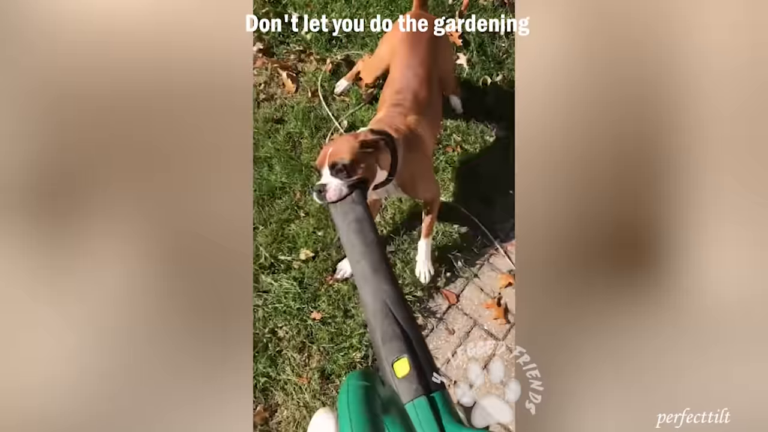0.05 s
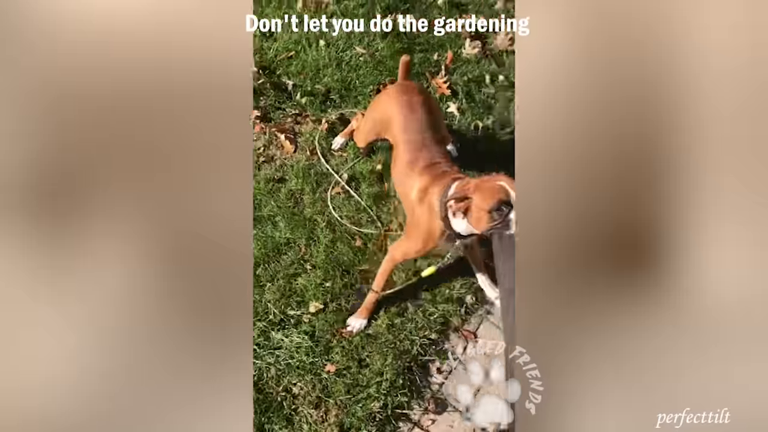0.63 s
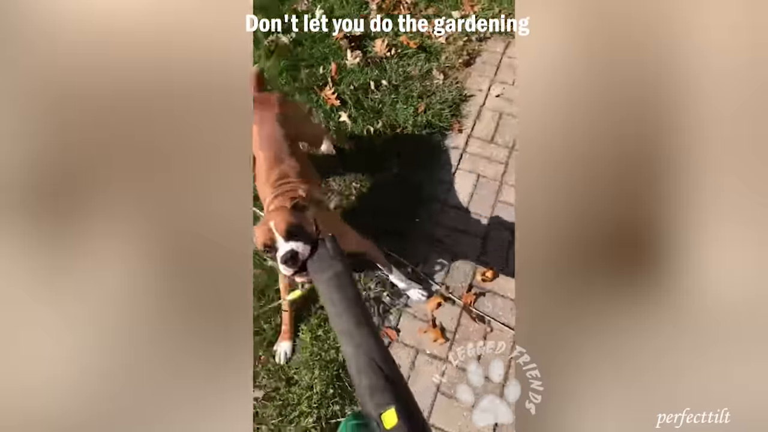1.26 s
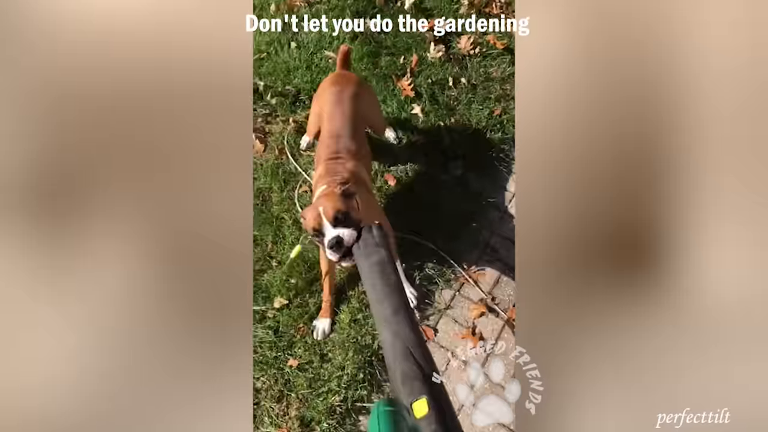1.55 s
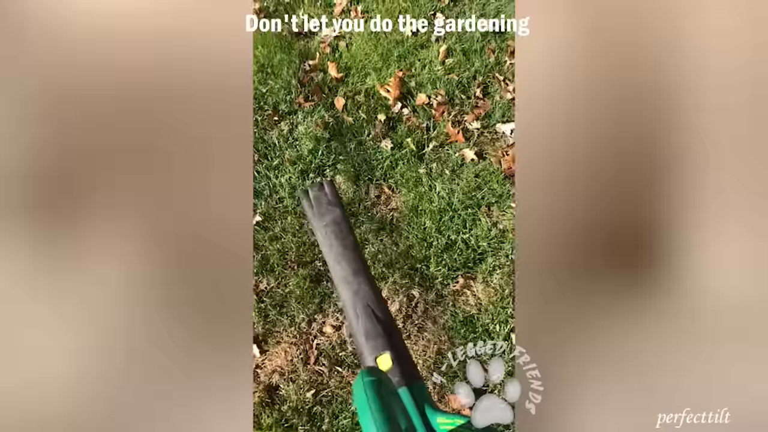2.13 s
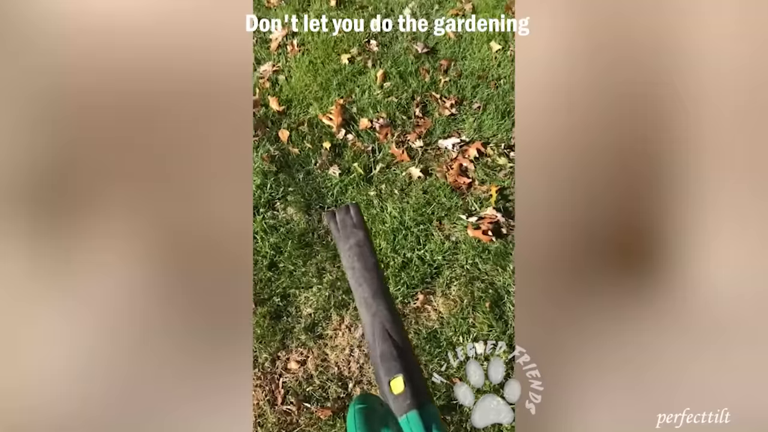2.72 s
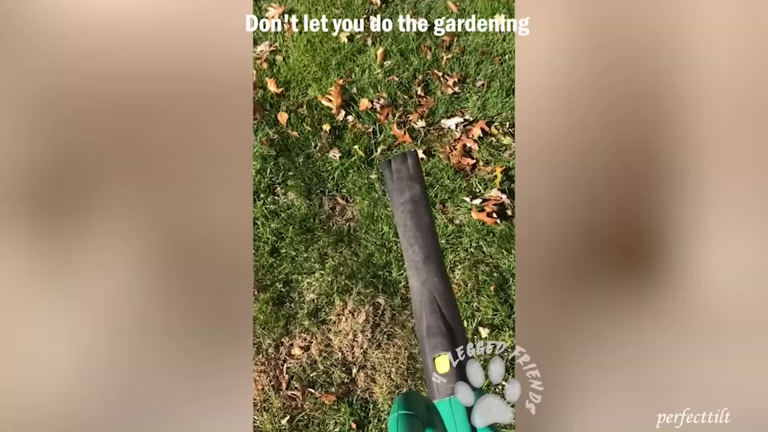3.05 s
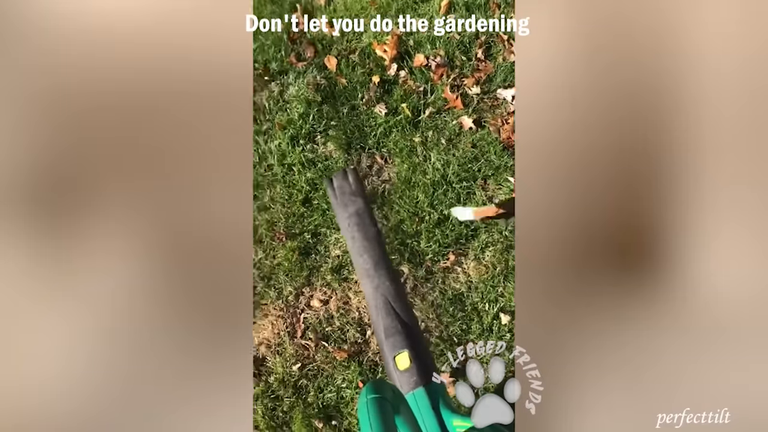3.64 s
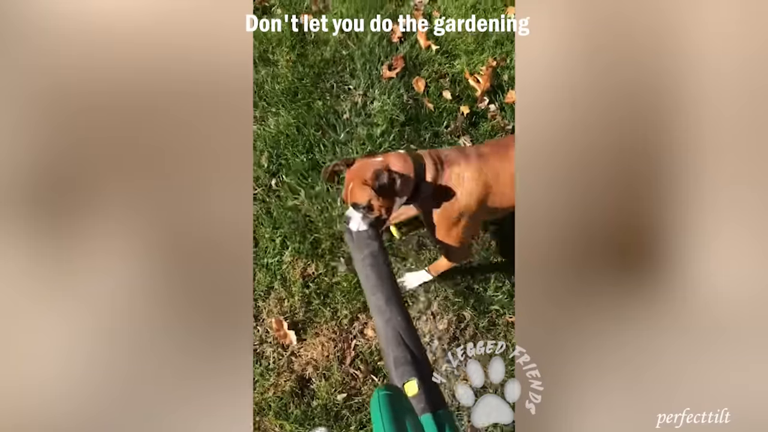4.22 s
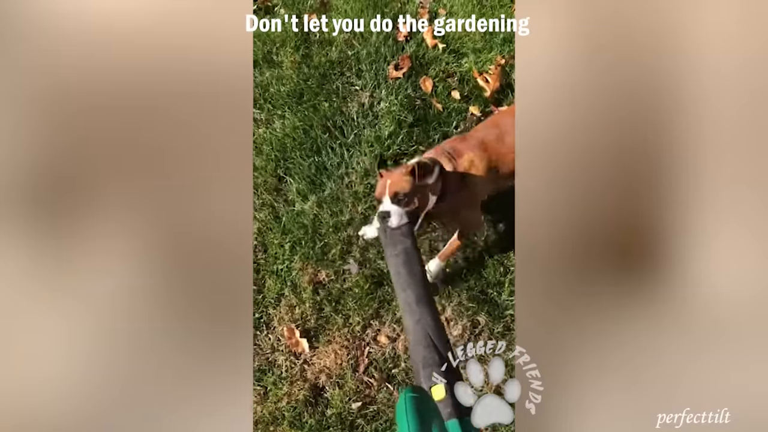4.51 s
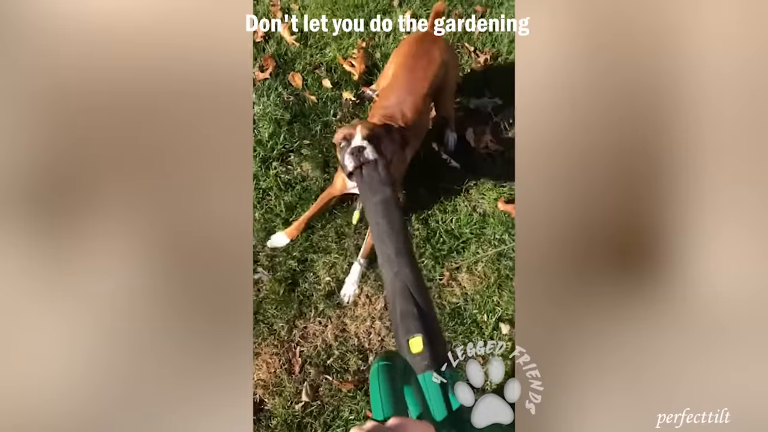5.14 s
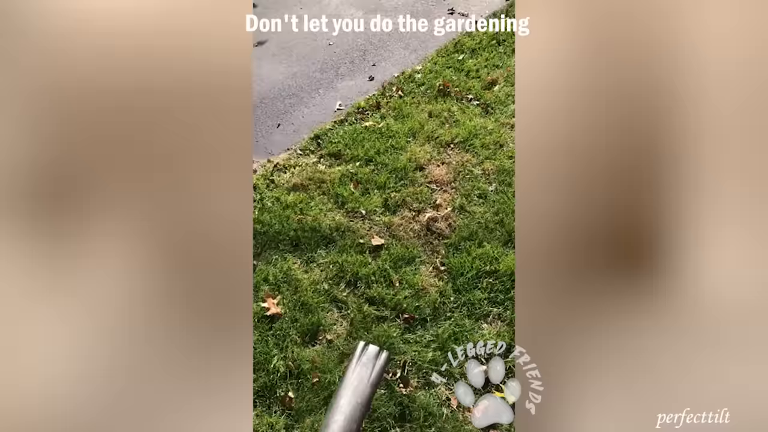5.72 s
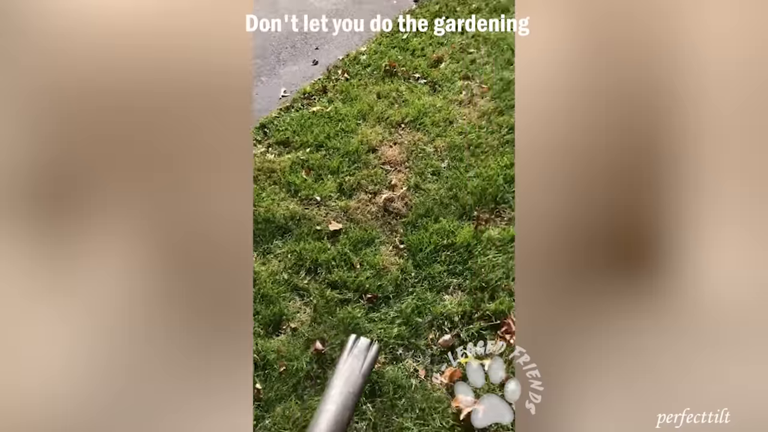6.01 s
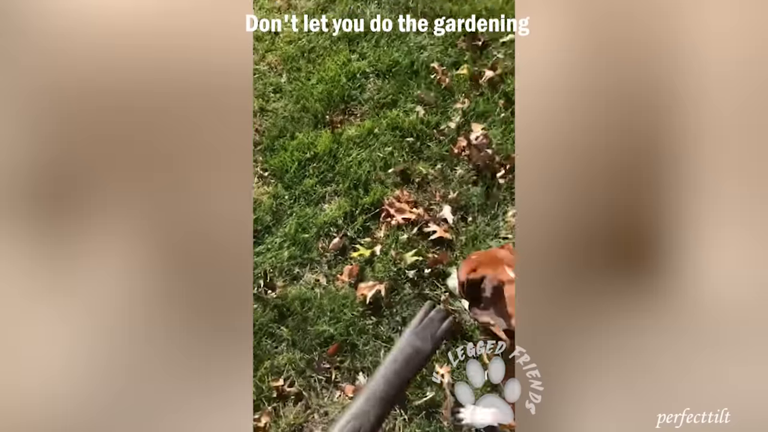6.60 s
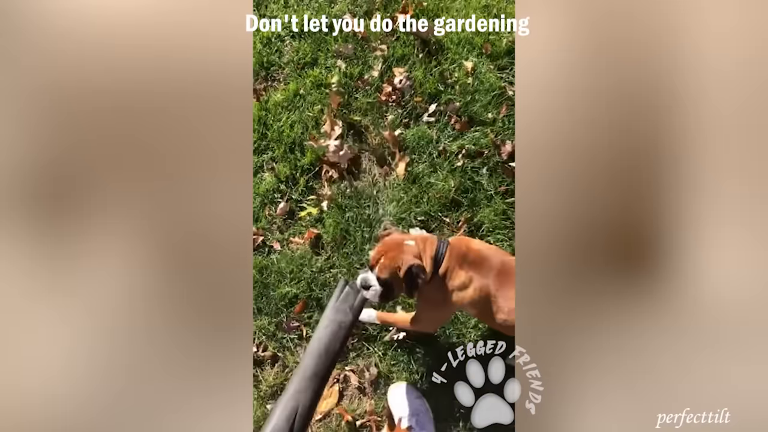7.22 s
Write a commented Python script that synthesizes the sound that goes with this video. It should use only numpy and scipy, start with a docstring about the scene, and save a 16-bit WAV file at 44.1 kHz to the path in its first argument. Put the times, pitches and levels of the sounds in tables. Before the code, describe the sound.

An electric leaf blower is already at full speed close by outdoors, a steady whine over a roar of air. Its hiss flutters and swells in hollow gusts as a dog bites at the nozzle, and a petrol mower drones faintly behind. At about 2.1 seconds everything cuts off abruptly, leaving two soft ticks and quiet garden air. Around 2.7 seconds the plastic switch and handle clack several times, and the motor starts with a short growl, whining upward to full speed by about 3.5 seconds. It blows steadily, with more hissing gusts from 4.5 to 5.4 seconds. At 5.8 seconds it breaks off again, and the distant mower is heard clearly. At 6.2 seconds a double clack starts another growl and rising whine. The blower reaches full speed near 7 seconds and roars over the mower until the end at 7.5 seconds.

```python
"""An electric leaf blower roars and whines over a lawn while a dog snaps at its nozzle.
Turbulence makes the roar in the tube and the hiss at the outlet; the fan and motor radiate
harmonics of the shaft rotation (orders). A petrol mower drones further off. Twice everything
breaks off; each time the switch clacks, the inrush current makes the plastic shell growl,
and the motor winds up again through its resonances."""
import sys
import numpy as np
from scipy import signal
from scipy.fft import rfft, irfft, next_fast_len
from scipy.io import wavfile
from scipy.ndimage import uniform_filter1d

SR = 44100
rng = np.random.default_rng(int(sys.argv[2]) if len(sys.argv) > 2 else 0)


def file_out(sig):
    """Save sig as 16-bit WAV at sys.argv[1]."""
    # one column per channel
    cols = np.atleast_2d(sig).T
    # limit, then scale
    lim = np.clip(cols, -1, 1)
    pcm = np.round(lim * 32767).astype(np.int16)
    wavfile.write(sys.argv[1], SR, pcm)


N = 328986
T = np.arange(N) / SR
FULL_HZ, MAINS_HZ = 250.5, 60  # full shaft speed, supply frequency
BLADE_COUNT, COMMUTATOR_BARS = 10, 12

# Air stream at full speed, a row per stretch of sound: roar_db, intake_db, hiss_db, spray_db
AIR_LEVELS = [(-24.5, -36.5, -34.5, -46.5), (-24.5, -37.5, -34.5, -42.5), (-26, -36.5, -34, -36)]
# Spectra of tube, intake, outlet (one per stretch) and jet spray: frequency_hz, density_db
ROAR_SPECTRUM = [(30, -26.5), (60, -22.5), (110, -16), (220, -10.5), (330, -3.5), (455, 0.5), (580, -6.5),
                 (780, -0.5), (950, -1.5), (1250, -3.5), (1480, -17.5), (1800, -28), (3000, -44.5)]
INTAKE_SPECTRUM = [(900, -26.5), (1400, 2.5), (1700, -0.5), (2000, 1.5), (2400, 1.5), (2650, -1.5),
                   (2900, -8), (3400, -28), (6000, -72)]
HISS_SPECTRA = [
    [(2500, -7), (3100, 0), (3500, 2), (4200, 5), (4800, 2), (5500, 4), (6200, 4.5), (6900, 1),
     (7400, -0.5), (8000, -3.5), (8800, -6), (10500, -21.5), (13000, -44)],
    [(2500, -28), (3100, -1.5), (3500, 5), (4200, 3), (4800, -1), (5500, 0), (6200, -1.5), (6900, -0.5),
     (7400, 4), (8000, -2.5), (8800, -15), (10500, -16.5), (13000, -53)],
    [(2500, -21), (3100, 6), (3500, 7), (4200, 2), (4800, 0.5), (5500, -2.5), (6200, -4), (6900, -2),
     (7400, 1.5), (8000, -6), (8800, -20), (10500, -6), (13000, -20)],
]
SPRAY_SPECTRUM = [(5000, -41), (7500, -8.5), (8700, 3), (10000, -2.5), (11500, -8.5), (13000, -19)]
# The jet splashes off the dog's muzzle: centre_s, half_length_s, hiss_lift_db, spray_lift_db
SPLASHES = [(.03, 0.23, 1, 6.5), (1.1, 0.35, 1.5, 2.5), (3.733, 0.37, 1, 1.5), (4.537, 0.059, 1, 3.5),
            (4.95, 0.039, 1, 5), (5.15, 0.1, 3.5, 7.5), (5.377, 0.064, 2, 5), (7.436, 0.073, 1.5, 1)]
# The dog holds the nozzle: start_s, end_s
GRIPS = [(-1, 2.15), (4.5, 5.82)]
# Hollow bands of rushing air: centre_s, half_length_s, pitch_hz, width_hz, level_db, glide_hz_per_s
HOLLOW_RUSHES = [(0.227, 0.047, 4120, 700, -35, 0), (0.226, 0.05, 6760, 1010, -33.5, 4998),
                 (.25, 0.036, 2186, 447, -30.5, -2000), (0.451, 0.054, 2340, 551, -34, -4000),
                 (0.524, 0.086, 6800, 600, -42, -5000), (.82, .035, 2250, 546, -32, 0),
                 (1.01, .07, 2400, 600, -33.5, 0), (1.164, .06, 4500, 800, -36.5, 5999.5),
                 (1.522, 0.11, 2620, 501, -36, 0), (1.8, 0.26, 6080, 646, -37, 2),
                 (4.38, 0.11, 1633, 260, -33.5, -0.5), (4.532, 0.024, 5900, 1990, -32.5, -2),
                 (4.803, 0.23, 870, 220.6, -31.5, 0), (4.952, 0.086, 4000, 900, -34.5, -0.5),
                 (5.22, 0.13, 3800, 1000, -34, -2500), (5.38, 0.05, 4100, 1500, -31.5, 0),
                 (6.978, 0.14, 3300, 450, -35.5, -1200), (7.05, 0.33, 835.6, 220, -29, 0)]

# Blade tone at full speed as the tube swings, a curve per stretch: time_s, level_db
BLADE_LEVEL_1 = [(0, -31), (.1, -28), (.3, -34), (.38, -33), (.48, -39), (.58, -29), (.66, -32),
                 (.88, -29.5), (1.1, -34), (1.28, -32), (1.43, -45), (1.55, -34), (1.75, -34), (2, -41),
                 (2.07, -32)]
BLADE_LEVEL_2 = [(3.35, -41), (3.55, -35.5), (3.75, -37), (4, -32.5), (4.15, -34), (4.38, -43), (4.48, -37),
                 (4.7, -36), (4.83, -39.5), (4.95, -34), (5.05, -36), (5.23, -28), (5.38, -35),
                 (5.5, -30.5), (5.68, -29.5), (5.76, -32)]
BLADE_LEVEL_3 = [(6.75, -44), (6.87, -36), (7.05, -39), (7.19, -34), (7.3, -39), (7.36, -36), (7.45, -42)]
# Other motor tones at full speed: order, stretch_1_db, stretch_2_db, stretch_3_db
MOTOR_TONES = [(1, -35.5, -37.5, -53), (3, -39, -36.5, -39), (12, -50, -52.5, -51), (14, -59, -54, -57),
               (20, -48.5, -48, -53), (24, -49, -51.5, -56), (30, -52.5, -43.5, -56.5),
               (35, -56.5, -60, -62), (36, -58, -53, -53), (39, -61.5, -72, -70)]
# The swinging housing beams an overtone at the listener: centre_s, half_length_s, order, lift_db
BEAMS = [(.13, .1, 24, 5), (.73, .06, 20, 8), (1.5, .12, 20, 5), (1.8, .22, 24, 7.5), (1.89, .04, 20, 8),
         (5.55, .22, 20, 2), (7.38, .17, 20, 5), (7.4, .16, 36, 10)]
# Resonances and dips of the housing: centre_hz, width_hz, gain_db
HOUSING_RESONANCES = [(60, 150, -30), (600, 200, -7), (2050, 500, 5), (4895, 130, 10.5), (7450, 1100, 10),
                      (7170, 370, 13)]
# The motor is switched on: start_s, initial_shaft_hz, wind_up_s, growl_db, sizzle_db, growl_centre_hz
STARTS = [(2.744, 0, .241, -30, -45, 520), (6.238, 39.3, .25, -31, -53, 760)]
# Resonances met in the run-ups: order, peak_shaft_hz, spread_hz, first_run_db, second_run_db
RUN_UP_RESONANCES = [(12, 71, 11, -42, -38), (12, 105, 18, -45, -45), (12, 162, 22, -41.5, -44),
                     (12, 195, 12, -52, -46), (10, 120, 18, -48, -46), (10, 160, 16, -43.5, -49),
                     (10, 194, 8, -60, -43), (10, 217, 6, -46, -54), (20, 208, 12, -54, -50),
                     (24, 86, 9, -49, -58), (24, 125, 14, -60, -53), (24, 182, 16, -54, -51),
                     (24, 219, 6, -44.5, -50), (30, 232, 4, -70, -44), (35, 243, 4, -52, -64),
                     (36, 143, 10, -53, -54), (36, 195, 8, -38, -64), (36, 214, 4, -40.5, -64),
                     (36, 242, 4, -49.5, -62), (48, 186, 9, -53, -50)]
# Tones of the brushes: order, relative_db
BRUSH_TONES = [(72, -55.5), (96, -63), (108, -62.5), (144, -66), (168, -65)]
# The brushes are heard only at low speed: shaft_hz, gain
BRUSH_RANGE = [(5, 0), (35, 1), (80, .8), (160, 0)]
# Friction of brushes on the commutator: frequency_hz, density_db
RUB_SPECTRUM = [(400, 2.5), (1000, -7), (2500, -1.5), (4500, -6.5), (6200, -6), (7400, -1), (8500, -21),
                (10000, -7), (13000, -33)]

# Clacks of switch and handle: start_s, snap_db, knock_db, snap_decay_s, shell_centre_hz
CLACKS = [(2.438, -64, -75, .02, 900), (2.634, -51.5, -57, 0.0082, 900), (2.674, -49, -37, 0.0026, 600),
          (2.687, -35.5, -40, 0.01, 1100), (2.696, -48, -24.5, 0.0016, 850),
          (2.737, -40.5, -26, 0.0058, 1150), (6.195, -30, -23.5, 0.004, 1200),
          (6.23, -35, -30, 0.0057, 1200)]
# Modes of the plastic shell: pitch_hz, level_db, t60_s
SHELL_MODES = [(428, 2, 0.13), (473, -7, 0.058), (580, 3, 0.018), (752, 2, 0.046), (828, -1, 0.077),
               (900, -2, 0.044), (1060, -7, 0.035), (1115, 1.5, 0.034), (1264, 0, 0.033), (1500, -3, 0.018),
               (1980, -2, 0.017), (3190, -12, .015)]
# Soft falling ticks: start_s, level_db, initial_pitch_hz
TICKS = [(2.2154, -35.5, 12700), (2.265, -37.5, 4800)]
# The handle squeaks in the hand: centre_s, half_length_s, pitch_hz, level_db
SQUEAKS = [(2.614, 0.0033, 6300, -64), (2.611, .004, 4900, -57.5)]

# Stretches of sound between the breaks, with their background:
# start_s, end_s, mower_firing_hz, mower_db, garden_db, mower_tilt_db_per_octave, rumble_db
STRETCHES = [(-.01, 2.092, 20.6, -38, -40, -2.5, -56.5), (2.205, 5.758, 21.6, -65.5, -57.5, -20, -69),
             (5.875, 7.5, 22.92, -35, -43, 3, -56)]
# Mower exhaust: firing_harmonic, relative_db
EXHAUST_HARMONICS = [(2, -4), (3, -10), (4, -5.5), (5, -3), (6, 1), (7, -11), (8, 3), (9, -6), (10, -7.5),
                     (12, 0), (13, -7), (14, -14), (15, -11), (16, -6), (18, -14), (20, -11)]
# The mower swells and recedes: time_s, lift_db
MOWER_SWELL = [(6.1, 0.5), (6.6, 3.5), (7.4, 1.5)]
# Its upper harmonics brighten: time_s, added_tilt_db_per_octave
MOWER_BRIGHTNESS = [(6.35, -2.5), (6.7, 0.5)]
# Spectra of the garden and of low outdoor rumble: frequency_hz, density_db
GARDEN_SPECTRUM = [(25, -11.5), (45, -7.5), (90, 2.5), (150, -3), (220, 0.5), (400, -4), (800, -13),
                   (1600, -23), (3000, -32.5), (6000, -36.5), (13000, -63.5)]
RUMBLE_SPECTRUM = [(25, -18), (45, 4.5), (70, -9.5), (150, -42.5)]


def air_stream(shaft_hz, held, stretch):
    """Turbulence in tube, intake and outlet radiates noise that grows as a power of the fan speed."""
    roar_db, intake_db, hiss_db, spray_db = AIR_LEVELS[stretch]
    decades = np.log10(shaft_hz / FULL_HZ)  # slopes are in dB per tenfold speed
    roar_db += 32 * decades
    intake_db += 49 * decades + 1.5 * held
    hiss_db += 43 * decades + .5 * held
    spray_db += 29.5 * decades
    for centre, half_length, hiss_lift_db, spray_lift_db in SPLASHES:
        splash = swell(centre, half_length)
        hiss_db += hiss_lift_db * splash
        spray_db += spray_lift_db * splash
    eddies = walk(30)
    roar = noise(ROAR_SPECTRUM, (420, 1400))
    intake = noise(INTAKE_SPECTRUM, (1550, 2300))
    hiss = wide_noise(HISS_SPECTRA[stretch], (3200, 6800), side_db=-5.5)
    spray = wide_noise(SPRAY_SPECTRUM, (8000, 12000), side_db=-7)
    roar *= undb(roar_db + .67 * eddies + .52 * walk(60))
    intake *= undb(intake_db + eddies)
    hiss *= undb(hiss_db + .7 * eddies + .7 * walk(150))
    spray *= undb(spray_db + .98 * walk(12) + walk(200))
    return roar + intake + hiss + spray


def motor(shaft_hz, stretch):
    """Periodic forces of imbalance, blades and commutator radiate at multiples of the shaft speed."""
    hz = shaft_hz * (1 + .00059 * walk(9))
    turns = np.cumsum(hz) / SR
    decades = np.log10(hz / FULL_HZ)
    hum_growth_db, whine_growth_db = 36 * decades, 55 * decades
    out = blade_tone(turns, decades, stretch)
    for order, *levels_db in MOTOR_TONES:
        # higher orders are shaken more by the air and sway as the tube swings
        shake = min(order / BLADE_COUNT, 1)
        lift_db = 3 * shake * walk(20)
        lift_db += sum(db * swell(centre, half) for centre, half, k, db in BEAMS if k == order)
        if order < BLADE_COUNT or order % BLADE_COUNT == 0:
            lift_db += housing_db(order * hz) - housing_db(order * FULL_HZ)
        growth_db = hum_growth_db if order == 1 else whine_growth_db
        partial = tone(turns, order, flutter_db=.9 * (1 + shake), smear_rad=.45 * shake)
        out += partial * undb(levels_db[stretch] + growth_db + lift_db)
    # the current pulses twice a mains cycle, putting a sideband above the commutator whine
    sideband = tone(COMMUTATOR_BARS * turns + 2 * MAINS_HZ * T, 1, flutter_db=1, smear_rad=.2)
    out += sideband * undb(-49.5 + whine_growth_db)
    if stretch > 0:
        out += run_up(hz, turns, stretch)
    return out + brushes(hz, turns, slowing=np.gradient(shaft_hz) < 0)


def blade_tone(turns, decades, stretch):
    """The fan sounds at its blade-passing frequency; inlet eddies spread a rough skirt around it."""
    level_db = curve([BLADE_LEVEL_1, BLADE_LEVEL_2, BLADE_LEVEL_3][stretch]) + 75 * decades
    core = tone(turns, BLADE_COUNT, flutter_db=2, smear_rad=.5)
    skirt = band(BLADE_COUNT * turns, width_hz=160) * undb(-13)
    return (core + skirt) * undb(level_db)


def housing_db(hz):
    """The frequency response of the housing colours tones that glide through its peaks and dips."""
    return sum(db * np.exp(-(2 * (hz - centre) / width) ** 2)
               for centre, width, db in HOUSING_RESONANCES)


def shaft_speed(held, load_sag_hz=1.3, coast_s=2.8):
    """Inertia makes the speed (Hz) coast down and wind up gradually; the air load lowers it a little."""
    top_hz = FULL_HZ - load_sag_hz * (1 - held)
    hz = top_hz
    for before, after, (start, initial_hz, wind_up_s, *_) in zip(STRETCHES, STRETCHES[1:], STARTS):
        age = T - start
        rise = 1 - np.exp(-(np.maximum(age, 0) / wind_up_s) ** .945)
        coasting_hz = initial_hz * np.exp(-age / coast_s)
        driven_hz = initial_hz + (top_hz - initial_hz) * rise
        mid_break_s = (before[1] + after[0]) / 2
        hz = np.where(T > mid_break_s, np.where(age < 0, coasting_hz, driven_hz), hz)
    return np.maximum(hz, 1)


def run_up(hz, turns, stretch):
    """Each order flares, a tone with a rasp around it, as the speed sweeps it through a resonance."""
    out = np.zeros(N)
    for order in sorted({row[0] for row in RUN_UP_RESONANCES}):
        flare = sum(undb(levels_db[stretch - 1]) * np.exp(-((hz - peak_hz) / spread_hz) ** 2)
                    for k, peak_hz, spread_hz, *levels_db in RUN_UP_RESONANCES if k == order)
        core = tone(turns, order, flutter_db=1.8, smear_rad=.45) * undb(-.5)
        if order == COMMUTATOR_BARS:  # the heavy, pulsing current modulates the whine
            core *= 1 + .9 * np.cos(2 * np.pi * 2 * MAINS_HZ * T)
        rasp = band(order * turns, width_hz=110) * undb(-3.5)
        skirt = band(order * turns, width_hz=420) * undb(-8)
        out += flare * (core + rasp + skirt)
    return out


def brushes(hz, turns, slowing):
    """Sliding friction rubs at low speed and sings on high orders while the rotor coasts."""
    audible = np.interp(hz, *np.transpose(BRUSH_RANGE))
    singing = sum(tone(turns, order, flutter_db=2, smear_rad=1) * undb(db) for order, db in BRUSH_TONES)
    rubbing = noise(RUB_SPECTRUM) * undb(-46.5)
    return audible * (slowing * singing * undb(-3.5) + rubbing)


def hollow_rushes():
    """Band-limited noise sounds hollow: fluttering bands of rushing air swell and slide in pitch."""
    out = np.zeros(N)
    for centre, half_length, hz, width_hz, db, glide in HOLLOW_RUSHES:
        sliding_hz = hz + glide * np.clip(T - centre, -2 * half_length, 2 * half_length)
        out += band(np.cumsum(sliding_hz) / SR, width_hz) * undb(db) * swell(centre, half_length)
    return out * undb(2.2 * walk(55))


def dog_grip(fade_s=.12):
    """Stopping the nozzle unloads the fan: 1 while the dog holds it, 0 while the jet blows freely."""
    return sum(np.clip(np.minimum(T - start, end - T) / fade_s + .5, 0, 1) for start, end in GRIPS)


def growl(start, growl_db, sizzle_db, centre_hz, fade_s=.076):
    """Inrush current forces the shell to vibrate twice a mains cycle and makes the brushes sizzle."""
    age = np.maximum(T - start, 0)
    jolts = np.diff(np.floor(2 * MAINS_HZ * age), prepend=0)
    rattle = rng.standard_normal(N) * np.sqrt(2 * MAINS_HZ / SR)
    body = shell(jolts + rattle, centre_hz)
    body /= np.std(body[T > start])
    body *= undb(growl_db) * (age > 0) * np.exp(-(age / fade_s) ** 4)
    sizzle_envelope = np.minimum(age / .085, 1) * np.exp(-age / .69)
    return body + band(7500 * T, width_hz=950) * undb(sizzle_db) * sizzle_envelope


def clacks():
    """Each impact of switch or handle gives a broadband snap and the impulse response of the shell."""
    snap_envelope, knocks = np.zeros(N), np.zeros(N)
    for start, snap_db, knock_db, decay_s, centre_hz in CLACKS:
        age = np.maximum(T - start, 0)
        snap_envelope += undb(snap_db) * (age > 0) * np.exp(-age / decay_s)
        impulse = 1. * (np.arange(N) == int(start * SR))
        knocks += undb(knock_db) * shell(impulse, centre_hz)
    snap = noise([(500, 7), (1300, 9), (3000, -2), (5000, 2), (8000, -2), (10000, -11), (13000, -26)])
    return snap * snap_envelope + .5 * knocks


def shell(force, centre_hz, focus_db_per_octave=10):
    """The plastic shell rings as a sum of damped modes, strongest near the pitch the force favours."""
    t = T[:SR // 8]
    ring = 0
    for k, (hz, db, t60) in enumerate(SHELL_MODES):
        level_db = db - focus_db_per_octave * abs(np.log2(hz / centre_hz))
        polarity = (-1) ** (k // 2)
        ring += polarity * undb(level_db - 60 * t / t60) * np.sin(2 * np.pi * hz * t)
    return signal.oaconvolve(force, ring)[:N]


def ticks(glide_cycles=2.1, length_s=.0083):
    """A chirp that falls from treble to bass within milliseconds is heard as a tick."""
    out = np.zeros(N)
    for start, db, hz in TICKS:
        age = np.clip(T - start, 0, 1)
        phase = 2 * np.pi * glide_cycles * np.log1p(age * hz / glide_cycles)
        out += undb(db) * np.sin(phase) * np.exp(-(age / length_s) ** 6)
    return out


def squeaks():
    """Friction of plastic on plastic gives brief narrow-band squeaks."""
    return sum(band(hz * T, width_hz=200) * undb(db) * swell(centre, half_length)
               for centre, half_length, hz, db in SQUEAKS)


def mower(firing_hz, level_db, tilt_db):
    """The periodic exhaust of a distant, governed four-stroke forms a wavering harmonic series."""
    turns = np.cumsum(firing_hz * (1 + .00408 * walk(4.3))) / SR
    db_per_octave = tilt_db + curve(MOWER_BRIGHTNESS)
    drone = np.zeros(N)
    for harmonic, db in EXHAUST_HARMONICS:
        treble_db = db_per_octave * max(np.log2(harmonic / 5), 0)
        partial = np.sin(2 * np.pi * (harmonic * turns + rng.random()))
        drone += partial * undb(db + treble_db + 2.6 * walk(14))
    return drone / np.std(drone) * undb(level_db + curve(MOWER_SWELL))


def tone(turns, order, flutter_db, smear_rad):
    """Uneven inflow modulates one shaft order in amplitude and phase."""
    phase = 2 * np.pi * order * turns + smear_rad * walk(45)
    return np.sqrt(2) * np.sin(phase) * undb(flutter_db * walk(35))


def band(turns, width_hz):
    """Random modulation in quadrature spreads a carrier into a band of noise, rms near 1."""
    phase = 2 * np.pi * turns
    return walk(2 * width_hz) * np.sin(phase) + walk(2 * width_hz) * np.cos(phase)


def noise(spectrum, span_hz=(20, 13000)):
    """White noise filtered to a spectrum, with rms 1 inside the span."""
    size = next_fast_len(N, True)
    f = np.arange(size // 2 + 1) * SR / size
    hz, db = np.transpose(spectrum)
    gain = undb(np.interp(np.log(f + 1), np.log(hz), db)) * (f > 20)
    power = np.sum(gain[(f > span_hz[0]) & (f < span_hz[1])] ** 2) / len(f)
    return irfft(rfft(rng.standard_normal(size)) * gain, size)[:N] / np.sqrt(power)


def wide_noise(spectrum, span_hz, side_db):
    """Partial decorrelation between the ears widens the treble of a hiss."""
    highpass = signal.butter(12, 4250, "high", fs=SR, output="sos")
    side = signal.sosfilt(highpass, noise(spectrum, span_hz))
    return noise(spectrum, span_hz) + undb(side_db) * side * np.array([[1], [-1]])


def walk(rate_hz):
    """Smoothed random steps give a wander with a spread near 1."""
    hold = max(int(SR / rate_hz), 2)
    steps = np.repeat(rng.standard_normal(N // hold + 1), hold)
    return 1.6 * uniform_filter1d(uniform_filter1d(steps, hold), hold)[:N]


def swell(centre_s, half_length_s):
    """A Gaussian rise and fall around a moment."""
    return np.exp(-((T - centre_s) / half_length_s) ** 2)


def curve(rows):
    """Linear interpolation through rows of time_s, value."""
    return np.interp(T, *np.transpose(rows))


def undb(db):
    """Decibels to amplitude ratio."""
    return 10 ** (np.asarray(db) / 20)


def scene():
    """Superposition of blower, mower and garden in three stretches, with the handling sounds on top."""
    growls = sum(growl(start, growl_db, sizzle_db, centre_hz)
                 for start, _, _, growl_db, sizzle_db, centre_hz in STARTS)
    out = np.zeros((2, N)) + clacks() + squeaks() + ticks() + growls
    garden, rumble = noise(GARDEN_SPECTRUM), noise(RUMBLE_SPECTRUM)
    held, rushes = dog_grip(), hollow_rushes()
    hz = shaft_speed(held)
    for stretch, (start, end, firing_hz, mower_db, garden_db, tilt_db, rumble_db) in enumerate(STRETCHES):
        blower = air_stream(hz, held, stretch) + motor(hz, stretch) + rushes * (hz / FULL_HZ) ** 2
        outdoors = garden * undb(garden_db) + rumble * undb(rumble_db)
        gate = uniform_filter1d(1. * ((T > start) & (T < end)), size=64)
        out += gate * (blower + mower(firing_hz, mower_db, tilt_db) + outdoors)
    return out


def record(dry):
    """An elliptic low-pass filter cuts the top treble off steeply."""
    return signal.sosfilt(signal.ellip(10, .2, 80, 13080, fs=SR, output="sos"), dry)


dry = scene()
out = record(dry)
file_out(out)
```